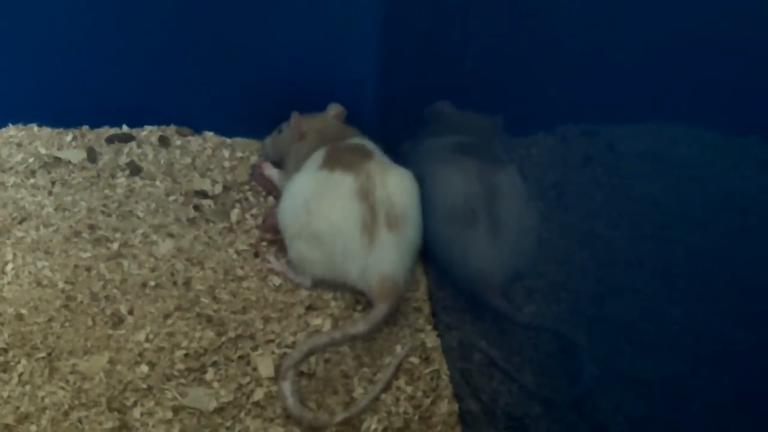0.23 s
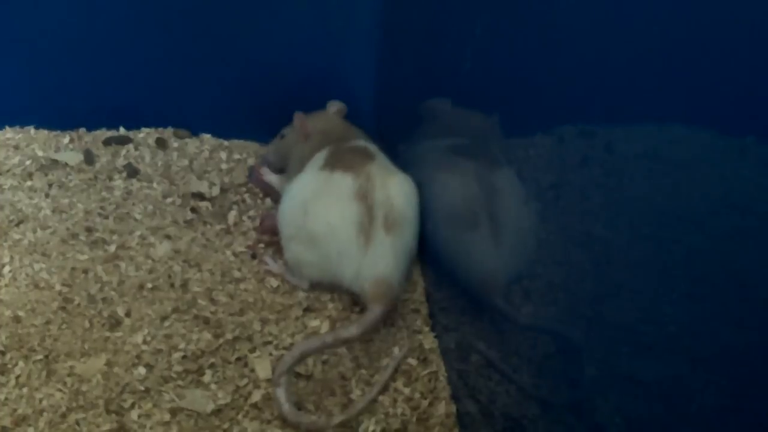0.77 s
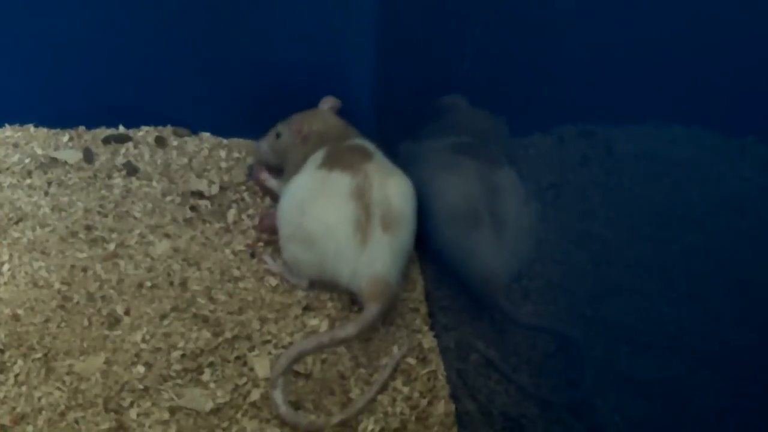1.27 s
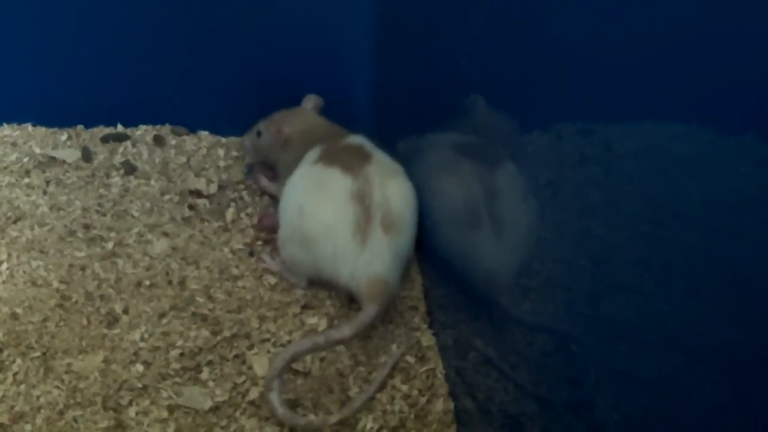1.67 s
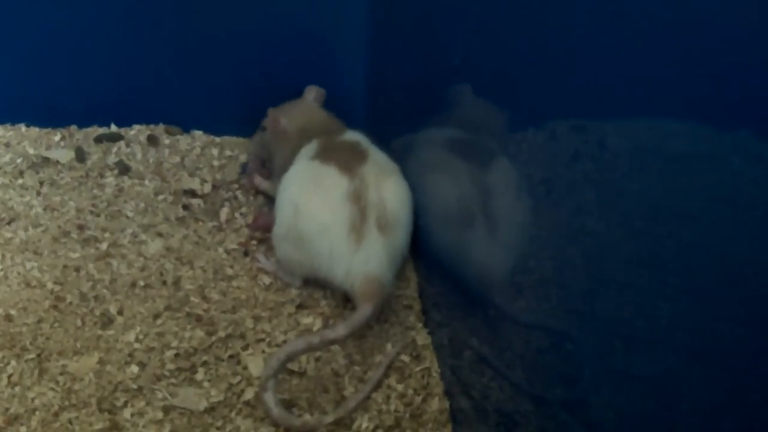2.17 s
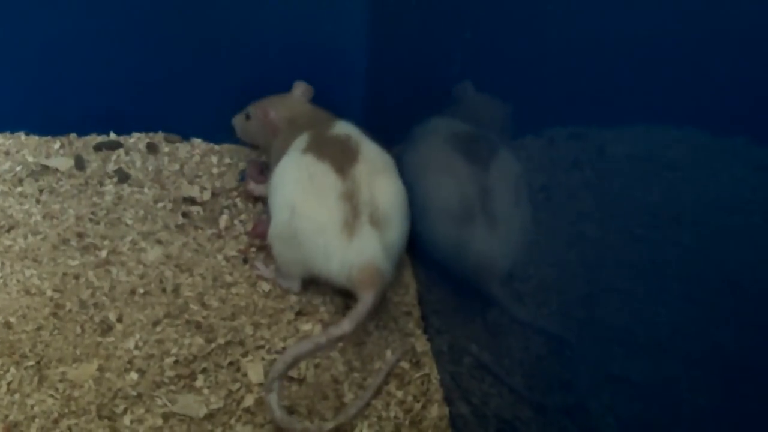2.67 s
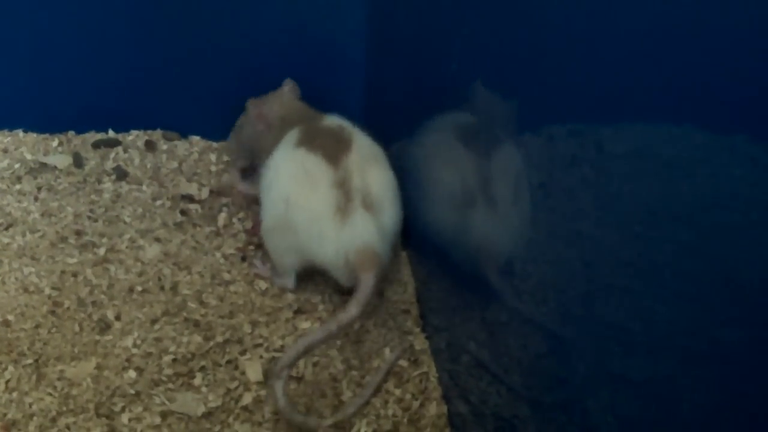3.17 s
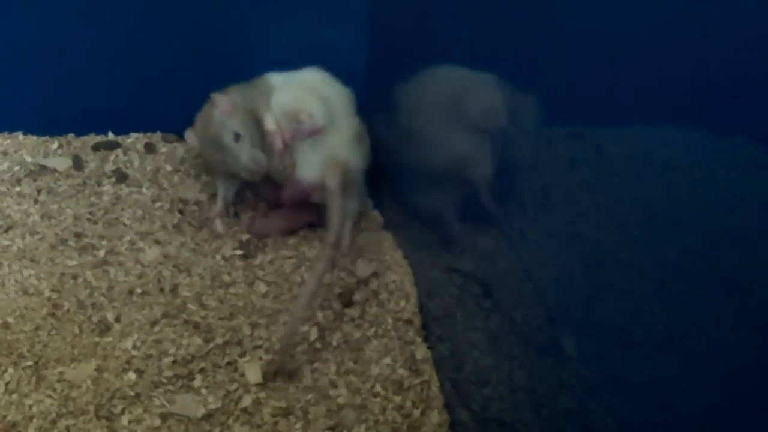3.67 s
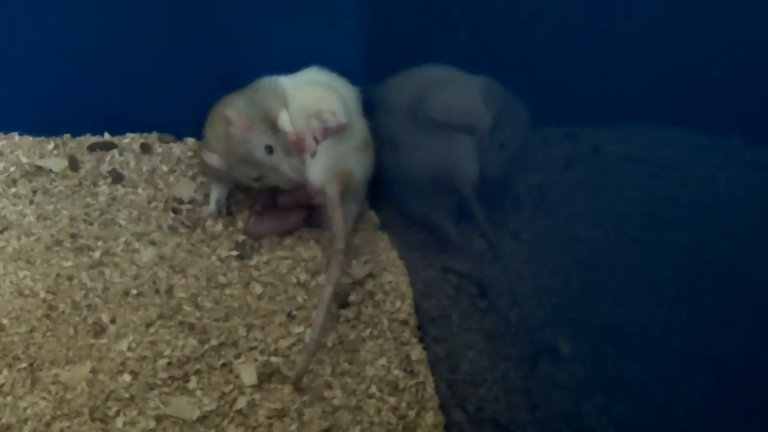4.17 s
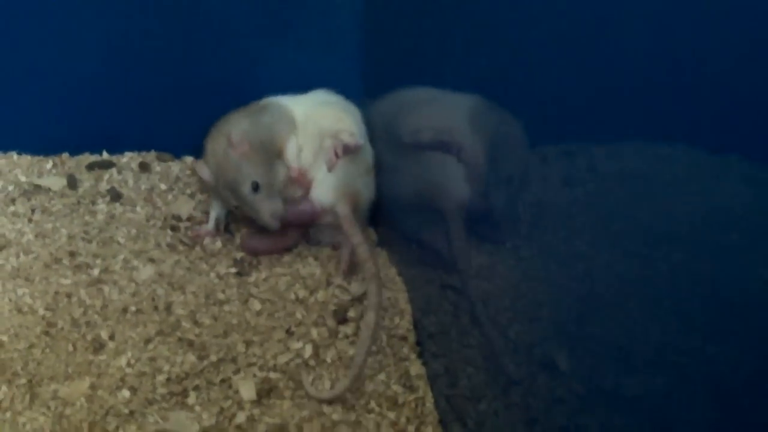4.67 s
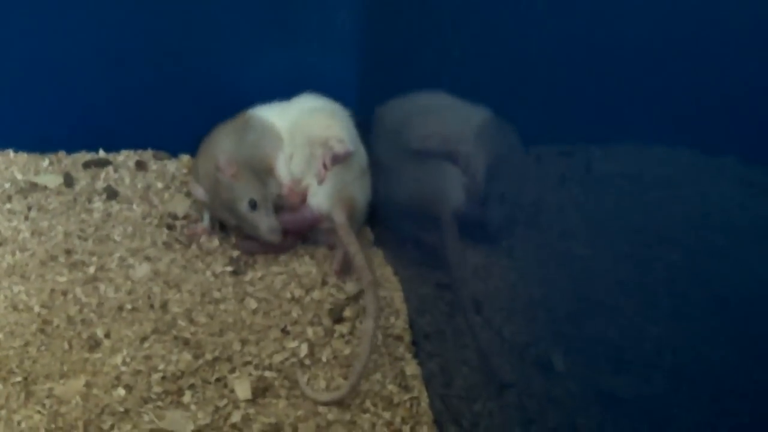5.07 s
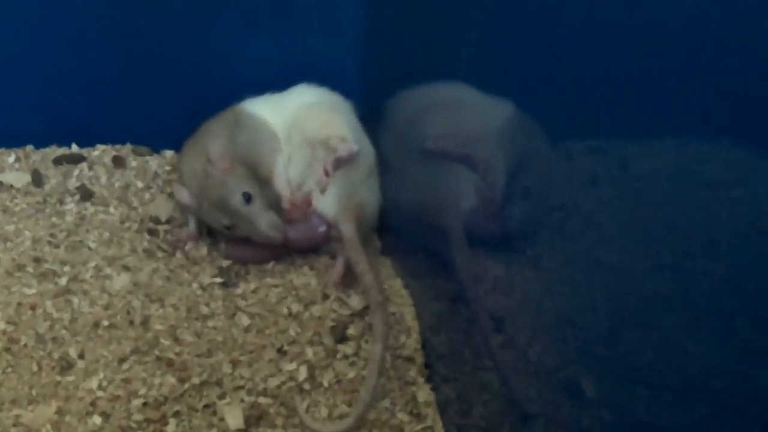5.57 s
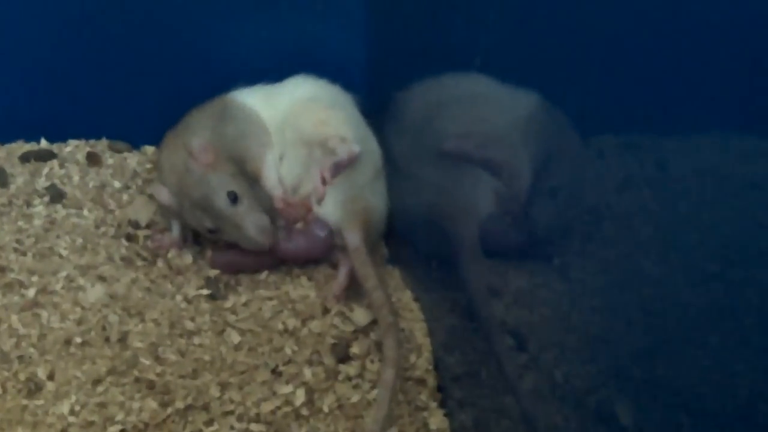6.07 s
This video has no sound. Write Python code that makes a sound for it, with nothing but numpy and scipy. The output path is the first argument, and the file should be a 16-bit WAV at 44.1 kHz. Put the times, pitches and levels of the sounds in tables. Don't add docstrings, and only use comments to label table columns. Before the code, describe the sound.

In a quiet, hissing room, a faint machine whine and fan clack off after about a second and wind down. Far birds chirp thinly. A rat pup gives two short, high, whistling squeaks that break into rasp, with dry litter ticks. Then the hand-held microphone bumps a plastic bin: a cluster of hard, hollow cracks, overloading at two hits. Low hand rumble, tiny ticks and bird notes close it.

```python
import sys
import numpy as np
from scipy import signal
from scipy.fft import rfft, irfft, next_fast_len
from scipy.io import wavfile
from scipy.ndimage import uniform_filter1d

SR = 44100
rng = np.random.default_rng(int(sys.argv[2]) if len(sys.argv) > 2 else 0)


def gain_from_db(level_db):
    decades = np.asarray(level_db, float) / 20
    return 10 ** decades


def log_audio(samples):
    frames = np.atleast_2d(samples).T
    limited = np.clip(frames, -1, 1)
    pcm = np.round(limited * 32767).astype(np.int16)
    wavfile.write(sys.argv[1], SR, pcm)


N = 278623
TIME = np.arange(N) / SR

# time in seconds, pitch in Hz, effort in dB, mouth opening in dB.
SQUEAKS = [
    [(3.164, 1860, -43, 10), (3.168, 2310, -38.5, -5), (3.176, 3053, -34.5, -14), (3.186, 3508, -38, -2),
     (3.19, 3300, -33, -4), (3.203, 3272, -34.5, -0.5), (3.213, 3480, -39, -1), (3.231, 3540, -33, -3),
     (3.239, 3650, -38, -4)],
    [(3.239, 3670, -24.5, -5), (3.244, 3462, -33, -13), (3.254, 3200, -28.5, -11), (3.261, 3210, -30, -10),
     (3.271, 3215, -36, 1), (3.277, 3525, -27, -8), (3.297, 3625, -31.5, 4), (3.308, 3633, -35, 4)],
    [(3.308, 3640, -34, 6), (3.314, 3230, -27.5, -7), (3.32, 3450, -30, -5.5), (3.327, 3574, -37, 4),
     (3.337, 3360, -36, -4), (3.341, 3115, -35, -14), (3.344, 2983, -67.5, -7)],
    [(3.48, 2998, -57, 6), (3.498, 3420, -32.5, 5.5), (3.507, 3450, -29, -1.5), (3.521, 3354, -36.5, 8),
     (3.547, 3466, -30, -3), (3.558, 3790, -29, -5), (3.568, 3800, -34, 0), (3.576, 3774, -28.5, -1),
     (3.588, 3450, -40.5, 11)],
    [(3.588, 3466, -37, 7.3), (3.592, 3330, -41, 13), (3.594, 3300, -43, 10.5), (3.599, 3132, -42, 18.6),
     (3.603, 3120, -56, 24), (3.607, 3100, -59.5, 13)],
]
# time in seconds, pitch in Hz, level in dB.
WHISTLE = [(3.503, 5660.0, -45), (3.514, 5420.0, -34), (3.522, 5500.0, -29), (3.536, 5560.0, -29.5),
           (3.547, 5650.0, -31), (3.558, 5430.0, -38), (3.569, 5840.0, -34), (3.58, 5850.0, -36),
           (3.591, 5560.0, -50)]
# multiple of the voice, multiple of the whistle, level in dB.
MIXING = [(-1, 1, -11), (1, 1, -6), (2, -1, -19), (3, -1, -12), (-2, 2, -13), (-2, 3, -12), (2, 1, -16),
          (-1, 2, -19), (5, -2, -17)]
# start in seconds, length in seconds, level in dB.
BREAKS = [(3.182, 0.028, -37.5), (3.204, .014, -45), (3.236, 0.03, -38), (3.253, .014, -44.5),
          (3.306, 0.024, -38.5), (3.503, 0.021, -37.5), (3.518, .014, -41), (3.53, 0.031, -36),
          (3.554, 0.035, -39.5)]
# frequency in Hz, density in dB per Hz.
RASP = [(500, -23), (1000, 2.5), (2200, -5.5), (3400, 4.5), (5000, 5.5), (7000, 2.5), (9500, -1),
        (12000, -10), (14500, 3), (16500, -12)]
CLEAR_DB, BREAK_EDGE_S = -44.5, 0.0046
UPPER_DB, UPPER_LEAST_DB = -23, -57
THROAT_HZ, THROAT_WIDTH_HZ, THROAT_DB = 14300, 1500, 9.5

# time in seconds, shell ring in dB, crack in dB, peak of the air push
# (full scale 1), brightness in dB per octave.
KNOCKS = [(2.306, -27, -55, 0.02, 1), (4.451, -35, -63, 0.008, 1), (4.711, -10, -21, -0.1, 3),
          (4.716, -30, -25, 0.1, 0.1), (4.7193, -12, -30, 0.34, 0.1), (4.7222, -15, -40, 0.05, 0.1),
          (4.7275, -11, -33, 0.25, 0.1), (4.7307, -14, -44, -0.5, 3), (4.7374, -30, -57, -0.26, 0.1),
          (4.7459, -20, -60, 0.3, 0.1), (4.7486, 8, -3, 1.4, -2), (4.7515, 4, -7, 0.1, 4),
          (4.817, -19, -40, 0, 3), (4.822, -28, -43, 0.15, 0.1), (4.914, -18.5, -42, .5, 0.1),
          (4.9176, -30, -61, 0.3, 0.1), (4.922, -26, -55, 0.25, 0.1), (4.934, -36, -37, 0, 0.1),
          (4.945, -36, -56, 0.07, 0.1), (4.9882, 10, 0.5, 2.8, -1), (4.9908, 6, -10, 0, 3),
          (5.012, -32, -60, 0, -4), (5.022, -32, -60, 0, -6), (5.029, -34, -59.5, 0, 3),
          (5.066, -20.5, -50.5, 0, 5), (5.186, -28, -57, 0, 3)]
# time in
# seconds, # level in dB, pitch in Hz, width over pitch.
TICKS = [(2.958, -35, 6500, 0.55), (2.958, -36, 3000, 0.5), (3.601, -23, 5200, 0.28),
         (3.612, -33.5, 3480, 0.82), (3.613, -29, 6540, 0.65), (3.615, -37.5, 10880, .5),
         (3.653, -29.5, 5440, 0.51), (3.653, -30.5, 2340, 0.53), (3.654, -38, 895, 0.88),
         (4.73, -36.5, 2890, 0.33), (3.793, -49, 4500, .5), (3.806, -44, 4500, .5),
         (4.218, -40.5, 244, 0.82), (4.273, -36.5, 7280, .5), (4.7535, -5.5, 581, 0.33),
         (4.7502, -0.5, 7560, 0.33), (4.756, -27, 5800, .4), (4.76, -38.5, 6000, .4),
         (4.759, -41.5, 3620, .25), (4.777, -45.5, 5490, .4), (4.816, -20, 3330, .2),
         (4.817, -28, 5620, 0.33), (4.8215, -35, 8300, .4), (4.8718, -13.5, 6480, .25),
         (4.8722, -13.5, 8700, .25), (4.871, -29, 3670, .4), (4.872, -30, 14100, .3),
         (4.899, -43.5, 14430, .3), (4.9345, -42, 8960, .6), (4.955, -44, 5500, 0.55),
         (5.748, -51.5, 4500, 0.48), (5.928, -45, 3160, 0.47), (5.948, -49.5, 7000, .5)]
# frequency in Hz, level in dB, t60 in seconds.
SHELL = [(255, -33, .1), (398, -37, .2), (428, -40, .24), (600, -13, .032), (840, -17, .03),
         (920, -7, .027), (1040, -4, .02), (1250, 0, .021), (1360, -3, .027), (1650, -17, .022)]
RING_PHASE = 1.5
RIM_HZ, RIM_WIDTH = 5200, 0.6
REBOUND = 0.085
TICK_RING_DB = -30

# start in seconds, length in seconds, level in dB.
SHUFFLES = [(2.258, 0.019, -48.5), (2.854, 0.1, -52.5), (3.32, 0.037, -45.5), (3.589, 0.07, -50),
            (3.75, 0.026, -45.5), (4.172, 0.044, -59), (4.328, 0.02, -63), (6.273, .04, -61)]
# frequency in Hz, density in dB per Hz.
LITTER = [(900, -7), (2500, -8.5), (3500, -4.5), (4600, -5), (6500, -4), (7800, -7), (9000, -17),
          (14000, -23)]

# time in seconds, level in dB.
GRIP = [(0, -35), (2.2, -31), (2.6, -38.5), (4.1, -36.5), (4.6, -32.5), (5.3, -29), (5.9, -31.5),
        (6.32, -26.5)]
# time of the peak in seconds, level in dB, half length in seconds.
JOLTS = [(0.113, -35.5, 0.11), (0.77, -53, 0.035), (1.2, -56, 0.12), (1.68, -47, 0.071), (2.36, -26, 0.069),
         (2.74, -46, 0.053), (2.925, -35.5, .05), (3.11, -45, 0.04), (3.303, -41.5, 0.074),
         (3.581, -31, 0.054), (4.214, -36.5, 0.039), (4.3, -32.5, 0.071), (4.49, -32, 0.032),
         (4.719, -25.5, 0.032), (4.793, -15.5, 0.043), (4.834, -20, .03), (4.932, -26, 0.064),
         (5.009, -18.5, 0.063), (5.11, -32, 0.047), (5.33, -34, 0.076), (5.854, -34.5, 0.058),
         (5.967, -37.5, 0.032)]
# frequency in Hz, density in dB per Hz.
HAND = [(10, -3), (22, -1.5), (38, -4.5), (55, -13), (90, -26.5), (160, -35), (300, -45.5)]

# frequency in Hz, level in dB rms.
WHINE = [(100.5, -48), (199.2, -56), (942.1, -66), (1238, -63), (2073, -53), (2363, -63), (2449, -65),
         (2756, -69), (4140, -60), (5421, -71), (6008, -70), (6212, -72)]
# time in seconds, level in dB.
FAN = [(0, -55.5), (.72, -51.5), (1.09, -54), (1.35, -60.5), (1.61, -55), (1.97, -68), (2.6, -67)]
# frequency in Hz, density in dB per Hz.
AIR = [(70, -0.5), (200, 6), (400, -19.5), (900, -1.5), (1300, -3.5), (1700, -5.5), (2400, 3), (3300, -6.5),
       (5500, -5), (7200, -2), (8500, -14.5)]
# time in seconds, level in dB, t60 in seconds.
CLACKS = [
    (1.103, -35.5, 0.16),
    (1.112, -30.5, 0.1),
    (1.121, -32, 0.12),
    (1.134, -33.5, 0.11),
    (1.153, -39.5, 0.33),
]
# frequency in Hz, density in dB per Hz.
CASING = [(410, -51), (700, -25), (1070, 4.5), (1370, -9), (1630, -2.5), (2030, -9.5), (2960, -4.5),
          (3690, -7), (4020, -5.5), (5520, -5.5), (6970, -6.5), (7690, -12), (12000, -22), (15500, -27)]
# start in seconds, frequency in Hz, level in dB, t60 in seconds.
PANEL = [(1.113, 1086, -37, 0.1), (1.113, 2930, -35.5, 0.15), (1.114, 4150, -39, 0.082),
         (1.116, 6960, -38.5, .07), (1.125, 4480, -41, 0.28)]

# start in seconds, length in seconds, start pitch in Hz, end pitch in Hz, level in dB.
BIRDS = [(1.325, .04, 5400, 3900, -64), (1.478, .025, 5600, 5550, -64), (1.488, .02, 5000, 4950, -66),
         (1.42, .04, 6700, 6500, -66), (2.262, .04, 5000, 3900, -67), (2.293, .016, 3800, 3770, -60),
         (1.352, .03, 3800, 3760, -62), (4.455, .04, 5600, 3850, -60), (5.288, .04, 6900, 6800, -60),
         (5.325, .075, 6800, 3800, -59.5), (5.405, .05, 4780, 4740, -65), (5.985, .035, 5700, 3900, -60),
         (6.012, .026, 3900, 3600, -57), (6.078, .07, 6750, 6500, -59), (4.484, .024, 3900, 3720, -60),
         (6.125, .04, 5700, 5100, -66), (6.1, .04, 6600, 6000, -64), (6.275, .02, 7400, 7300, -64)]

# frequency in Hz, density in dB per Hz.
ROOM = [(53, -37.5), (90, 3.5), (165, -10), (255, -13), (378, -18), (412, -15.5), (558, -18), (1190, -14.5),
        (1550, -18.5), (2290, -21), (5470, -22), (6790, -20.5), (9210, -26), (12200, -27.5), (16200, -28)]
# frequency in Hz, density in dB per Hz.
DUCT = [(1050, -28.5), (1180, -1.5), (1240, -3), (1320, -4), (1450, -38.5)]
# time in seconds, level in dB.
DUCT_SWELL = [(0, 10), (1.1, -3), (1.3, 7), (1.5, 10.5), (1.9, 1), (2.3, 6.5), (2.43, 8), (2.55, 0.5),
              (6.32, -6)]

# frequency in Hz, level in dB rms.
CIRCUIT = [(10282, -76.5), (11989, -71.5), (12016, -76), (13695, -78.5)]
BLIP_BEATS = [2, 7, 15, 16, 20, 21, 24, 26, 27, 40, 43, 46, 50, 52, 57, 62]
# frequency in Hz, density in dB per Hz.
BLIP = [(8500, -20), (9700, 0), (11300, -10), (13000, -1), (14500, -20)]
CLOCK_S, CLOCK_START_S, BLIP_DB = 0.1, 0.0405, -57.5
# frequency in Hz, density in dB per Hz.
APART = [(59, -36), (366, -15), (900, -8), (1810, -10), (7860, -10), (11000, -7), (16200, -7)]


def unit(x):
    return x / np.sqrt(np.mean(x ** 2) + 1e-20)


def curves(rows, rest):
    s, *columns = np.transpose(rows)
    return [np.interp(TIME, s, column, rest, rest) for column in columns]


def filtered(x, response):
    m = next_fast_len(len(x) + 8192)
    hz = np.fft.rfftfreq(m, 1 / SR) + 1e-3
    return irfft(rfft(x, m) * response(hz), m)[:len(x)]


def noise(spectrum, count=N):
    f, db = np.transpose([(1, -120), *spectrum, (SR / 2, -120)])
    white = rng.standard_normal(count)
    return unit(filtered(white, lambda hz: gain_from_db(np.interp(np.log(hz), np.log(f), db))))


def wobble(rate):
    knots = rng.standard_normal(int(N * rate / SR) + 4)
    part, whole = np.modf(TIME * rate)
    whole = whole.astype(int)
    left, right = knots[whole], knots[whole + 1]
    return left + (right - left) * part ** 2 * (3 - 2 * part)


def add(track, s, x):
    part = track[round(s * SR):][:len(x)]
    part += x[:len(part)]


def echoes(x, t60, wet_db):
    t = TIME[:SR // 2]
    tail = rng.standard_normal(len(t)) * gain_from_db(-60 * t / t60)
    return x + gain_from_db(wet_db) * signal.fftconvolve(x, tail / np.linalg.norm(tail))[:N]


def pup():
    hz, first, mouth_db = np.max([curves(call, -120) for call in SQUEAKS], axis=0)
    hz = uniform_filter1d(np.maximum(hz, 1800), size=70)
    second = first + mouth_db
    upper = np.maximum((first + second) / 2 + UPPER_DB, np.minimum(UPPER_LEAST_DB, first - 8))

    chaos_db = np.full(N, CLEAR_DB)
    for s, length, db in BREAKS:
        to_edge = np.minimum(TIME - s, s + length - TIME)
        chaos_db += (db - CLEAR_DB) * np.clip(to_edge / BREAK_EDGE_S, 0, 1)
    chaos_db = np.minimum(chaos_db, np.maximum(first, second) + 3)
    rasp_db = -36 + 1.7 * (chaos_db + 34)
    shake = np.clip(gain_from_db(rasp_db + 41), 0, 1)

    jitter = 0.006 * wobble(200) + 0.022 * shake * wobble(900)
    phase = 2 * np.pi * np.cumsum(hz * (1 + jitter)) / SR
    flutter = gain_from_db(1.6 * wobble(500) * shake + 1.1 * wobble(170))
    beat = np.cos(2 * np.pi * np.cumsum(1200 + 130 * wobble(200)) / SR)
    flutter *= 1 + 0.55 * shake * beat * (TIME < 3.4)

    throat = THROAT_DB * np.exp(-((4 * hz - THROAT_HZ) / THROAT_WIDTH_HZ) ** 2)
    partials = [
        first,
        second + 2 * wobble(90) + shake * (3.5 * wobble(450) - 2),
        upper + 1 - 4 * shake + 5 * wobble(70),
        upper - 8 + throat + 5 * wobble(70),
        upper - 8,
    ]
    tone = np.zeros(N)
    for k, db in enumerate(partials, 1):
        tone += gain_from_db(db + 4) * np.sin(k * phase) * (k * hz < 16000)

    high_hz, high_db = curves(WHISTLE, -120)
    waver = np.where(TIME < 3.548, 0.014, 0.04) * wobble(600)
    high = 2 * np.pi * np.cumsum(high_hz * (1 + waver)) / SR
    tone += gain_from_db(high_db + 3.2) * np.sin(high)
    for m, n, db in MIXING:
        tone += gain_from_db(high_db + db + 2.1 * wobble(150)) * np.sin(round(m) * phase + round(n) * high)

    lumps = gain_from_db(1.2 * wobble(700))
    rasp = gain_from_db(rasp_db + 7.5) * lumps * noise(RASP) * (1 + 0.35 * np.cos(phase))
    return echoes(flutter * tone + rasp, t60=0.05, wet_db=-15)


def shell_ring(tilt_db):
    t = TIME[:SR // 4]
    size, start = rng.normal(0, 1.2, (2, len(SHELL)))
    ring = np.zeros(len(t))
    for (f, db, t60), d, p in zip(SHELL, size, start):
        bright_db = tilt_db * np.log2(max(f, 600) / 1200)
        mode = np.sin(2 * np.pi * f * t + RING_PHASE + 0.71 * p)
        ring += gain_from_db(db + d + bright_db - 60 * t / t60) * mode
    return ring * (1 - np.exp(-t / 0.00034))


def crack(hz, wide):
    t = TIME[:SR // 4 // 3]
    burst = rng.standard_normal(len(t)) * gain_from_db(-60 * t / (0.007 + 16 / hz))
    x = filtered(burst, lambda f: (1j * f * 0.7 * hz / (hz * hz - f * f + 1j * f * wide * hz)) ** 2)
    return x / abs(x).max()


def air_push(push):
    u = TIME[:SR // 4] - 0.01
    dip = np.where(u < 0, np.exp(np.minimum(u, 0) / 0.00039), np.exp(-abs(u) / 0.0013))
    swing = 2.6 * (1 - np.exp(-np.maximum(u, 0) / 0.005)) * np.exp(-abs(u) / 0.011)
    return push * (REBOUND * push * swing - dip)


def knocks():
    dull, sharp = np.zeros(N), np.zeros(N)
    contacts = [(s, db, crack_db, RIM_HZ, RIM_WIDTH, push, tilt_db)
                for s, db, crack_db, push, tilt_db in KNOCKS]
    contacts += [(s, db + TICK_RING_DB, db, hz, wide, 0, 0) for s, db, hz, wide in TICKS]
    for s, db, crack_db, hz, wide, push, tilt_db in contacts:
        add(dull, s, gain_from_db(db - 4.5) * shell_ring(tilt_db))
        add(sharp, s, gain_from_db(crack_db) * crack(hz, wide))
        add(dull, s - 0.01, air_push(push))
    return sharp + filtered(dull, lambda f: 1 / (1 - (f / 1550) ** 2 + 1j * f / 1550) ** 3)


def litter():
    swell = np.zeros(N)
    for s, length, db in SHUFFLES:
        add(swell, s, gain_from_db(db) * np.hanning(round(length * 1.4 * SR)) ** 0.3)
    return swell * noise(LITTER) * gain_from_db(2 * wobble(350))


def handling():
    grip_db, = curves(GRIP, -45)
    grip = gain_from_db(grip_db - 1 + 2.2 * wobble(9))
    jolts = sum(gain_from_db(db) * np.exp(-((TIME - s) / half) ** 2) for s, db, half in JOLTS)
    return (grip + jolts) * gain_from_db(-4 + 1.22 * wobble(26)) * noise(HAND)


def machine():
    since_off = np.clip(TIME - CLACKS[0][0], 0, None)
    running = gain_from_db(2 * (np.minimum(TIME, 1.1) - 0.35) - 60 * since_off / 0.71)
    out = np.zeros(N)
    for hz, db in WHINE:
        tone = np.sin(2 * np.pi * hz * TIME + 0.65 * wobble(24))
        out += running * gain_from_db(db + 3 + 1.4 * wobble(20)) * tone
    air_db, = curves(FAN, -120)
    out += gain_from_db(air_db + 4.5 + 1.5 * wobble(19.85)) * noise(AIR)
    t = TIME[:SR // 3]
    for s, db, t60 in CLACKS:
        add(out, s, gain_from_db(db - 60 * t / t60) * (1 - np.exp(-t / 0.0012)) * noise(CASING, count=len(t)))
    for s, hz, db, t60 in PANEL:
        level = gain_from_db(db - 60 * t / t60 + 2.7 * wobble(150)[:len(t)])
        add(out, s, level * np.sin(2 * np.pi * hz * t))
    return out


def birds():
    glides, held, waver = np.zeros(N), np.zeros(N), wobble(900)
    for s, length, start_hz, end_hz, db in BIRDS:
        u = np.linspace(0, 1, round(length * SR))
        gliding = start_hz - end_hz > 450
        waver_hz = waver[round(s * SR):][:len(u)] * (500 if gliding else 70)
        hz = start_hz + (end_hz - start_hz) * u + waver_hz
        note = gain_from_db(db) * np.sin(np.pi * u) ** 0.4 * np.sin(2 * np.pi * np.cumsum(hz) / SR)
        add(glides if gliding else held, s, note)
    hoarse = gain_from_db(3 * wobble(600))
    smeared = hoarse ** 1.5 * echoes(glides, t60=0.05, wet_db=6)
    far = echoes(smeared, t60=0.45, wet_db=1)
    near = echoes(hoarse * held * gain_from_db(7.5), t60=0.3, wet_db=-8)
    return far + near


def room():
    hush = gain_from_db(-50 + 1.1 * wobble(6)) * noise(ROOM)
    swell_db, = curves(DUCT_SWELL, 0)
    return hush + gain_from_db(-67 + swell_db + 2.2 * wobble(5.4)) * noise(DUCT)


def camera():
    out = sum(gain_from_db(db + 7 + 1.1 * wobble(8)) * np.sin(2 * np.pi * hz * TIME) for hz, db in CIRCUIT)
    for beat in BLIP_BEATS:
        blip = np.hanning(800) * noise(BLIP, count=800)
        add(out, CLOCK_START_S + beat * CLOCK_S, gain_from_db(BLIP_DB + rng.normal(0, 1.5)) * blip)
    return out


def scene():
    near = pup() + knocks()
    mid = near + litter() + handling() + machine() + birds() + room() + camera()
    side = gain_from_db(-66) * noise(APART) + gain_from_db(-39) * filtered(near, lambda f: 1j * (1 + f / 3000))
    return np.array([mid + side, mid * gain_from_db(0.1) - side])


def top_cut(x):
    return signal.sosfilt(signal.butter(12, 15850, fs=SR, output="sos"), x)


def record(dry):
    clipped = np.clip(dry, -0.9, 1.01)
    limited = np.array([filtered(v, lambda f: f < 16000) for v in clipped])
    return top_cut(limited)


dry = scene()
out = record(dry)
log_audio(out)
```